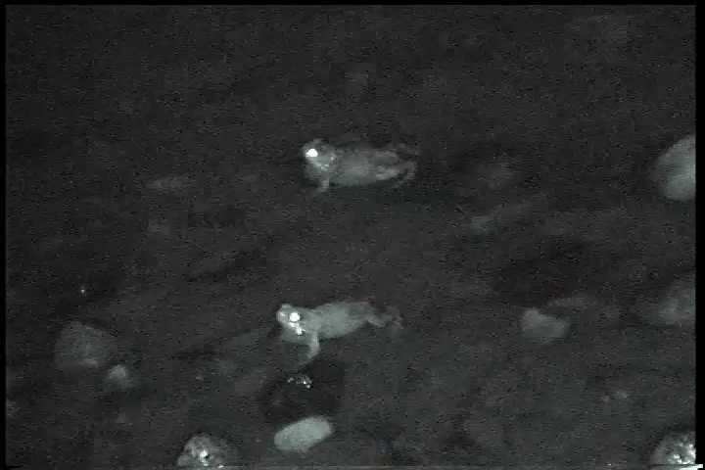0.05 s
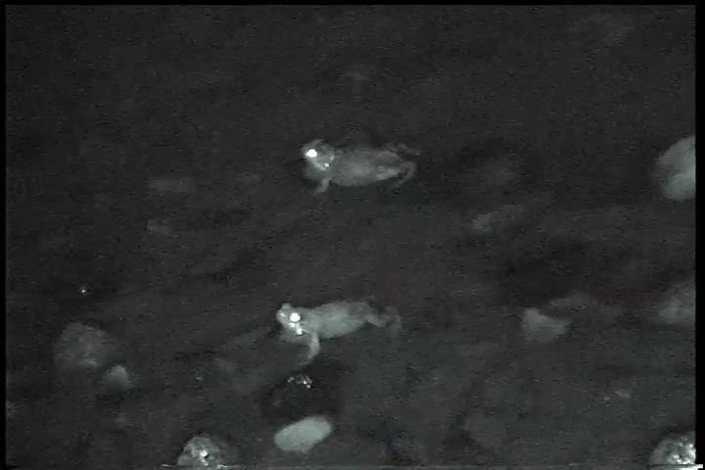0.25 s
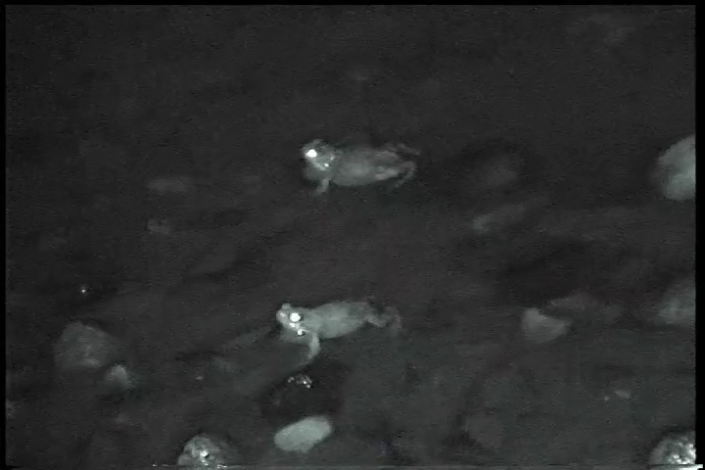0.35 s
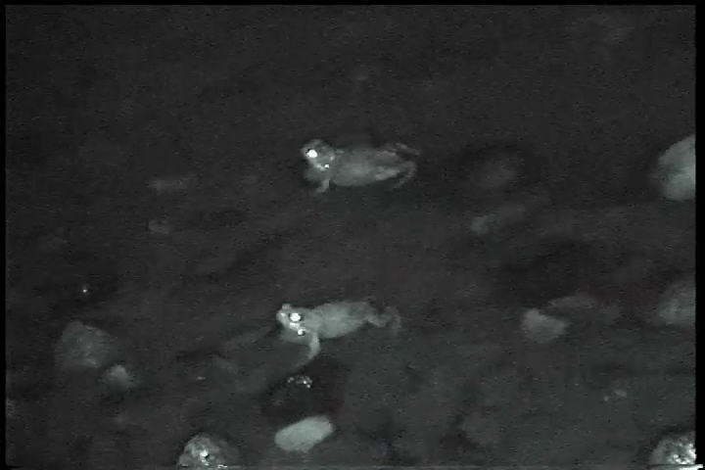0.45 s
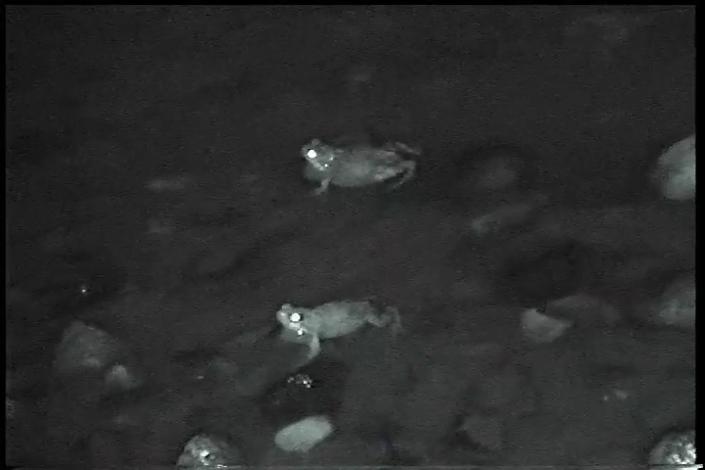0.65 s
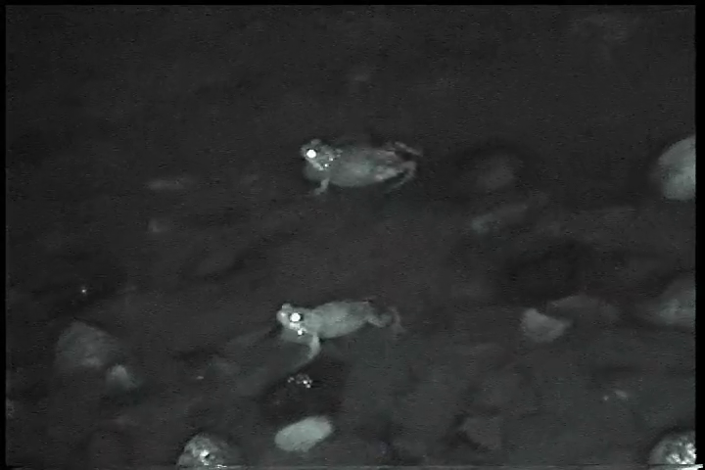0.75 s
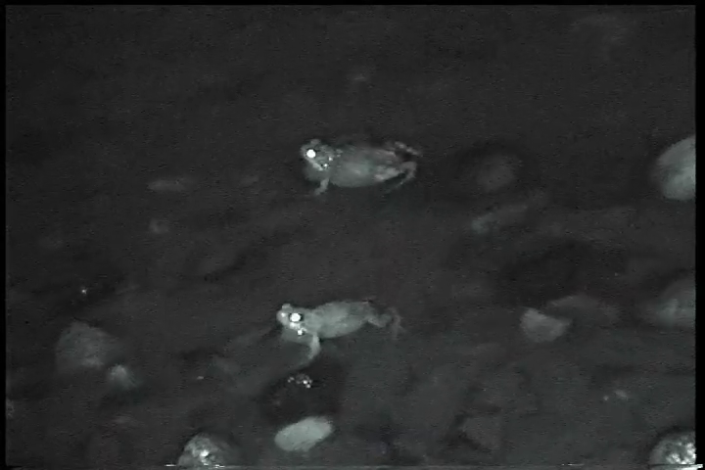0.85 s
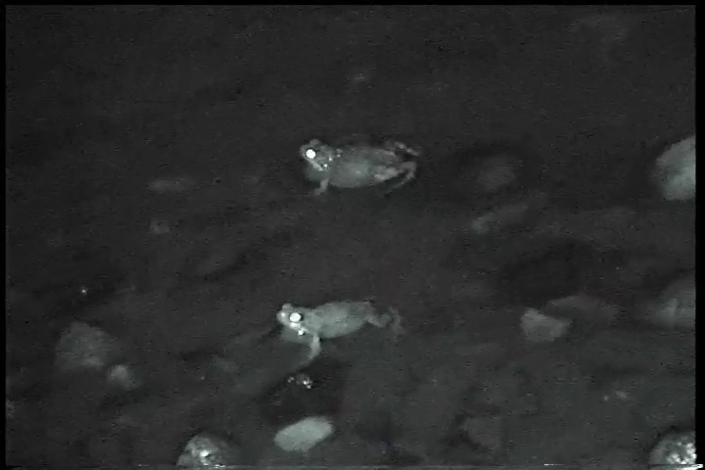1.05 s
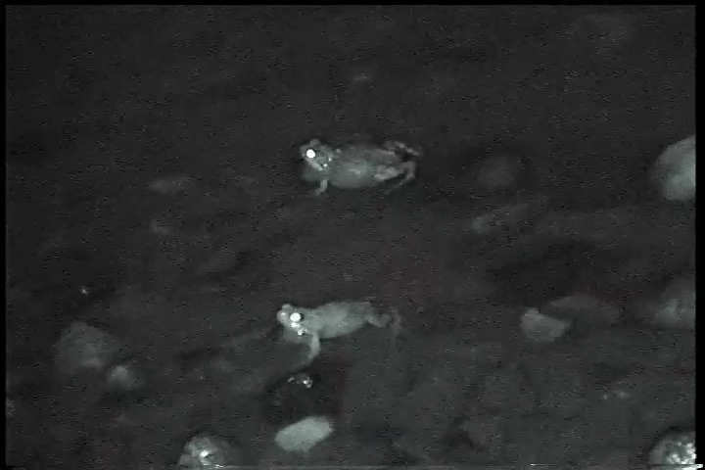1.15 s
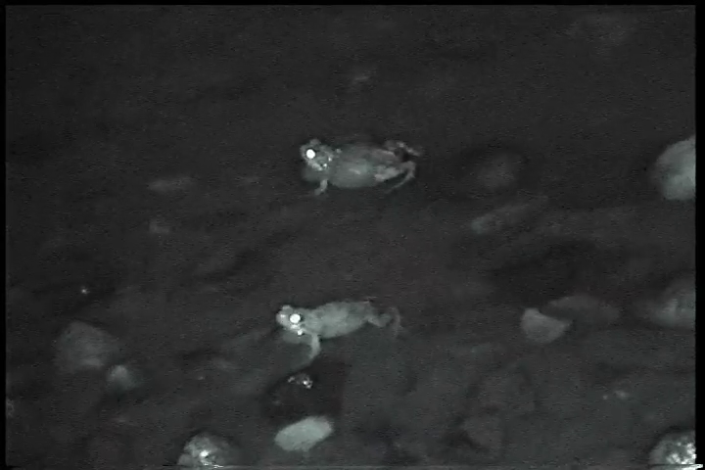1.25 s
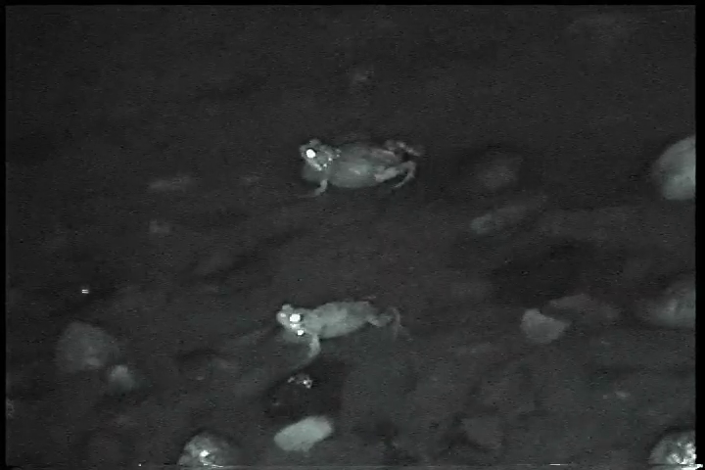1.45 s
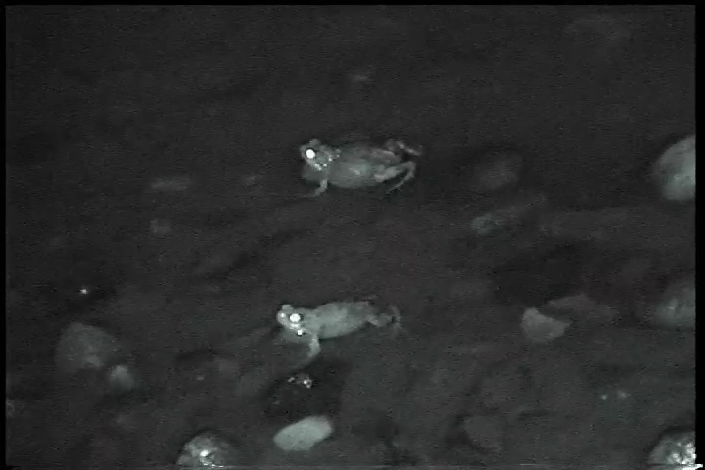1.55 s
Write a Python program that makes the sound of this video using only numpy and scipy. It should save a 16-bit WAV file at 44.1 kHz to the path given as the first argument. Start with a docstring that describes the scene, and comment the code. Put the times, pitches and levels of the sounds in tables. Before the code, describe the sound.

Frogs calling with downward whines and a short chuck, with an insect chorus behind.

```python
"""A small frog close to the microphone, on the right, gives a falling whine that ends in a chuck.
It calls from shallow water at night; a second answers with a whine that sinks into a low moan, and
others whine farther off. A whine is a larynx tone whose overtones slide through the resonances of the
vocal sac; a chuck is a run of pulses striking the throat. Behind the pool is a steady chorus of insects
in soft night air, and the recorder adds a faint hum and whistle."""
import sys
import numpy as np
from scipy import signal
from scipy.fft import rfft, irfft
from scipy.io import wavfile
from scipy.ndimage import uniform_filter1d

SR = 44100
rng = np.random.default_rng(int(sys.argv[2]) if len(sys.argv) > 2 else 0)


def file_out(sig):
    """Save sig as 16-bit WAV at sys.argv[1]."""
    # one column per channel
    cols = np.atleast_2d(sig).T
    # limit, then scale
    lim = np.clip(cols, -1, 1)
    pcm = np.round(lim * 32767).astype(np.int16)
    wavfile.write(sys.argv[1], SR, pcm)


N = 70560
T = np.arange(N) / SR

# night air all around: (frequency [Hz], relative density [dB])
AIR_SPECTRUM = [(25, -78.5), (70, -74.5), (170, -85), (500, -85), (1000, -84.5), (1400, -90.5), (2000, -88),
                (3400, -90), (4500, -84), (5200, -92), (6500, -78), (8200, -97.5), (8900, -83.5),
                (10000, -84)]
# its likeness in the two channels: (frequency [Hz], correlation [clipped to -1..1])
AIR_LIKENESS = [(60, -1.1), (250, -.5), (520, -0.34), (1070, -0.15), (2200, 0.57), (4500, 0)]
# its lean to one side: (frequency [Hz], pan [dB]); every pan is left minus right
AIR_PAN = [(40, 5.5), (120, 6), (400, -2.5), (1500, 2.5), (5000, 1.5)]
# distant insects and frogs: (centre [Hz], width [Hz], level [dB], pulse rate [1/s], pulse depth [0-1])
CHORUS_BANDS = [(437, 55, -64, 3.19, 0.3), (2607, 130, -57, 14, 0.7), (2990, 120, -63, 7.2, 0),
                (3880, 375, -55, 40, 0.17), (4334, 28, -57.5, 20, 0.3), (4695, 77, -52.5, 45, .3),
                (4817, 120, -51.5, 14, .3), (4962, 62, -50, 11, 0.36), (5330, 30, -58.5, 16, 0),
                (5710, 270, -50, 30, 0.22), (6080, 95, -53.5, 53, 0), (6195, 110, -47.5, 35, 0.3),
                (6450, 180, -47, 35, 0), (6653, 55, -49.5, 35, 0.7), (7000, 39, -54, 23, 0.1),
                (7195, 330, -46.5, 18, 0.17), (7550, 120, -52, 25, 0), (7838, 270, -50, 58, 0.4),
                (9280, 220, -56.5, 86, 0), (9687, 440, -52.5, 95, 0.5)]
# frogs farther off: (start [s], length [s], first pitch [Hz], target pitch [Hz], glide time [s],
# first level [dB], relative overtones at mid-call [dB], brightening [dB/s], pan [dB])
FAR_WHINES = [(-.04, 0.336, 819, 382, 0.21, -43.5, -2.5, 72, -5),
              (0.338, .31, 898.5, 400, .168, -45, -11, 17, 0),
              (1.184, 0.228, 838, 481, .14, -49.5, -6, 20, -6),
              (1.596, .3, 990, 420, .17, -27.5, -19, 20, 9)]
# larynx overtones: (multiple [of the pitch], relative level [dB], full strength below pitch [Hz])
FAR_LARYNX = [(2, 1.5, 630), (3, -8.5, 680), (4, -1.5, 610), (5, -6, 450)]
SECOND_LARYNX = [(2, 3.5, 1000), (3, -12.5, 700), (4, -1.5, 720), (5, -5, 670), (6, 4.5, 450)]
NEAR_LARYNX = [(2, -0.5, 1100), (3, -9.5, 1100), (4, -1.5, 1100), (5, -2, 630), (6, -12, 580),
               (7, -24, 800)]
# what the vocal sac radiates: (frequency [Hz], relative gain [dB])
SECOND_SAC = [(950, -9.5), (1300, -9.5), (1700, -1), (2350, 2), (2800, -4.5), (3300, -4.5), (3700, -18),
              (4300, -27)]
NEAR_SAC = [(950, -13), (1300, -5.5), (1700, -6.5), (2300, 4), (2750, -7.5), (3400, -6.5), (3800, -14),
            (4300, -26)]
# fall of the two close whines: (time [s], pitch [Hz])
SECOND_PITCH = [(1.085, 882.4), (1.115, 812.5), (1.155, 698), (1.199, 627), (1.313, 522.2), (1.379, 488),
                (1.423, 480.7), (1.465, 452)]
NEAR_PITCH = [(0.211, 948.6), (0.223, 913), (0.247, 816.4), (0.303, 655.3), (0.329, 621.7), (0.399, 581.3),
              (0.515, 499.5), (0.533, 497), (0.547, 459), (0.567, 428), (0.59, 419.4)]
# their fundamentals: (time [s], level [dB])
SECOND_LEVEL = [(1.085, -37.5), (1.097, -35.5), (1.115, -31.5), (1.293, -36), (1.441, -49), (1.465, -64)]
NEAR_LEVEL = [(0.211, -24.5), (0.219, -21), (0.239, -20), (0.279, -28), (0.441, -33.5), (0.569, -45),
              (0.59, -54)]
# their overtones together: (time [s], level [dB])
SECOND_OVERTONES = [(1.085, -59), (1.097, -46), (1.245, -37.5), (1.363, -49), (1.459, -53.5), (1.465, -66)]
NEAR_OVERTONES = [(0.211, -33.5), (0.219, -33.5), (0.427, -34.5), (0.471, -38.5), (0.481, -43.5),
                  (0.535, -50.5)]
# the second frog's closing moan: (time [s], pitch [Hz], level [dB])
MOAN_CONTOUR = [(1.464, 447, -57), (1.5, 436.5, -57.5), (1.538, 425.6, -44), (1.552, 431, -46.5),
                (1.563, 407, -55.5), (1.58, 419, -50), (1.6, 420, -53)]
# its harmonics: (multiple [of the pitch], relative level [dB])
MOAN_HARMONICS = [(1, -0.5), (2, -5), (3, -7), (4, -18), (5, -26), (6, -19)]
# the near frog's chucks, pulsing at about half its whine's pitch:
# (start [s], length [s], first pulse rate [1/s], peak relative to CHUCK_DB [dB])
CHUCKS = [(.2795, .022, 340, -9), (.5512, .0325, 224.5, 0)]
# throat resonances struck by each pulse: (frequency [Hz], relative level [dB], time to fall 60 dB [s])
THROAT_MODES = [(1105, -11.5, 0.0069), (1654, -3, 0.0039), (2130, 0.5, 0.0059), (2743, -2.5, 0.012)]
# mains hum in the recorder: (frequency [Hz], level [dB])
MAINS_HUM = [(60, -65.5), (120, -68.5), (180, -71.5)]

AIR_DB = -43.5
BANK_DB, BANK_T60_S = -13.5, 0.18
FAR_ATTACK_S, FAR_RELEASE_S, FAR_FADE_DB_PER_S = 0.0085, 0.066, 27.5
ATTACK_S, RELEASE_S, SETS_IN_DB_PER_HZ = 0.0034, .012, 0.3
NEAR_PAN_DB, SECOND_PAN_DB, NEAR_LEFT_DELAY_S = -10.5, -1.8, .00004
CHUCK_DB, CHUCK_PAN_DB, CHUCK_TOP_HZ = -14, -9, 3010
CHUCK_FIRST_FORCE, CHUCK_RISE_S, CHUCK_FALL_POWER = 0.53, .005, 2.6
CHUCK_SLOWS_PER_S, CHUCK_JITTER_S, CHUCK_DULLS_PER_HZ = 2.7, .00003, 0.00042
MIC_TOP_HZ, RECORDER_TOP_HZ = 9950, 16000
HUM_PAN_DB, WHISTLE_HZ, WHISTLE_DB = 2, 15735, -76


def from_db(db):
    """Decibels to gain."""
    return 10 ** (np.asarray(db) / 20)


def rms_one(x):
    """Scale to unit rms."""
    return x / np.sqrt(np.mean(x ** 2) + 1e-20)


def in_time(rows):
    """Each column of a curve at every sample."""
    times, *columns = np.transpose(rows)
    return [np.interp(T, times, column) for column in columns]


def at_hz(points, hz):
    """Read a spectrum on a log-frequency axis."""
    freqs, values = np.transpose(points)
    return np.interp(np.log(hz + 1e-9), np.log(freqs), values)


def pan(db):
    """Left and right gains with mean 1; positive is to the microphone's left."""
    gains = from_db(np.array([np.atleast_1d(db), -np.atleast_1d(db)]) / 2)
    return gains / gains.mean(axis=0)


def gate(start, end, attack, release):
    """Rise from start, hold, and fall to nothing at end."""
    return np.clip((T - start) / attack, 0, 1) * np.clip((end - T) / release, 0, 1)


def tone(hz):
    """A sine of unit rms that follows a pitch."""
    return np.sqrt(2) * np.sin(2 * np.pi * np.cumsum(hz * np.ones(N)) / SR + rng.uniform(0, 2 * np.pi))


def night_air():
    """A soft, wide bed of noise all around the microphone."""
    hz = np.arange(N // 2 + 1) * SR / N
    mid, side = rfft(rng.standard_normal((2, N)))
    alike = np.clip(at_hz(AIR_LIKENESS, hz), -1, 1)
    stereo = np.sqrt(1 + alike) * mid + np.sqrt(1 - alike) * side * [[1], [-1]]
    spectrum = stereo * from_db(at_hz(AIR_SPECTRUM, hz)) * pan(at_hz(AIR_PAN, hz)) * (hz < MIC_TOP_HZ)
    return from_db(AIR_DB) * rms_one(irfft(spectrum, N))


def chorus():
    """Far behind the pool many singers share each pitch: narrow bands, most throbbing unsteadily."""
    out, hz = 0, np.arange(N // 2 + 1) * SR / N
    for centre, width, db, rate, depth in CHORUS_BANDS:
        shape = 1 / np.sqrt(1 + (2 * np.abs(hz - centre) / width) ** 6)
        band = rms_one(irfft(rfft(rng.standard_normal((2, N))) * shape, N))
        drift = rms_one(uniform_filter1d(rng.standard_normal(N), size=4000))
        throb = 1 + depth * tone(rate * (1 + .04 * drift)) / np.sqrt(2)
        out = out + from_db(db) * rms_one(band * throb)
    return out


def bank_scatter(calls):
    """The calls come back faintly from the stones and plants around the pool."""
    tail = rng.standard_normal((2, N)) * from_db(-60 * T / BANK_T60_S)
    tail /= np.sqrt(np.sum(tail ** 2, axis=1, keepdims=True))
    return from_db(BANK_DB) * signal.fftconvolve(calls.mean(axis=0)[None], tail, axes=1)[:, :N]


def frog_voice(hz, level_db, overtones_db, larynx, sac):
    """A larynx tone whose overtones set in as the pitch falls and slide through the sac's resonances."""
    gains = {}
    for multiple, db, full_hz in larynx:
        held_back_db = SETS_IN_DB_PER_HZ * np.maximum(hz - full_hz, 0)
        gains[multiple] = from_db(db + at_hz(sac, multiple * hz) - held_back_db)
    overtones = sum(gain * tone(multiple * hz) for multiple, gain in gains.items())
    overtones /= np.sqrt(sum(gain ** 2 for gain in gains.values()))
    return from_db(level_db) * tone(hz) + from_db(overtones_db) * overtones


def far_whines():
    """Frogs farther from the microphone: each call glides down, fading and growing reedier."""
    out = 0
    for start, length, first_hz, target_hz, glide, db, relative_db, brightening, pan_db in FAR_WHINES:
        age = np.clip(T - start, 0, length)
        hz = target_hz + (first_hz - target_hz) * np.exp(-age / glide)
        level_db = db - FAR_FADE_DB_PER_S * age
        overtones_db = level_db + relative_db + brightening * (age - length / 2)
        call = frog_voice(hz, level_db, overtones_db, FAR_LARYNX, SECOND_SAC)
        out = out + pan(pan_db) * call * gate(start, start + length, FAR_ATTACK_S, FAR_RELEASE_S)
    return out


def moan():
    """A low, reedy stack of harmonics ends the second frog's call."""
    hz, db = in_time(MOAN_CONTOUR)
    stack = sum(from_db(level) * tone(multiple * hz) for multiple, level in MOAN_HARMONICS)
    sounding = gate(MOAN_CONTOUR[0][0], MOAN_CONTOUR[-1][0] + RELEASE_S, RELEASE_S, RELEASE_S)
    return stack * from_db(db) * sounding


def chucks():
    """Short runs of slowing pulses strike the resonances of the near frog's throat."""
    out = 0
    for start, length, rate, db in CHUCKS:
        age = np.arange(int(length * rate) + 1) / rate
        age *= 1 + CHUCK_SLOWS_PER_S * age / 2
        age += np.abs(rng.normal(0, CHUCK_JITTER_S, len(age)))
        rise = np.minimum(CHUCK_FIRST_FORCE + age / CHUCK_RISE_S, 1)
        fall = np.maximum(1 - (age / length) ** CHUCK_FALL_POWER, 0)
        pulses = np.zeros(N)
        pulses[((start + age) * SR).astype(int)] = rise * fall
        throat = 0
        for k, (hz, level, t60) in enumerate(THROAT_MODES):
            strikes = pulses ** (hz * CHUCK_DULLS_PER_HZ) + 1e-18  # weaker pulses are duller
            decay, angle = from_db(-60 / (t60 * SR)), 2 * np.pi * hz / SR
            ring = signal.lfilter([0, np.sin(angle)], [1, -2 * decay * np.cos(angle), decay ** 2], strikes)
            throat = throat + (-1) ** k * from_db(level) * ring
        throat = signal.sosfilt(signal.butter(10, CHUCK_TOP_HZ, fs=SR, output="sos"), throat)
        out = out + from_db(CHUCK_DB + db) * throat / np.abs(throat).max()
    return out


def close_whine(pitch, level, overtones, larynx, sac):
    """A clean, rounded downward sweep from a frog close to the microphone."""
    hz = uniform_filter1d(in_time(pitch)[0], size=800)
    dying_db = 60 * np.clip((T - overtones[-1][0]) / (2 * RELEASE_S), 0, 1)
    sounding = gate(level[0][0] - ATTACK_S / 2, level[-1][0] + RELEASE_S, ATTACK_S, RELEASE_S)
    return frog_voice(hz, in_time(level)[0], in_time(overtones)[0] - dying_db, larynx, sac) * sounding


def scene():
    """From the microphone: one frog near right, one almost ahead, the rest and the chorus beyond."""
    near_whine = close_whine(NEAR_PITCH, NEAR_LEVEL, NEAR_OVERTONES, NEAR_LARYNX, NEAR_SAC)
    near = pan(NEAR_PAN_DB) * near_whine + pan(CHUCK_PAN_DB) * chucks()
    near[0] = np.interp(T - NEAR_LEFT_DELAY_S, T, near[0])
    answer = close_whine(SECOND_PITCH, SECOND_LEVEL, SECOND_OVERTONES, SECOND_LARYNX, SECOND_SAC)
    frogs = near + pan(SECOND_PAN_DB) * (answer + moan()) + far_whines()
    return frogs + bank_scatter(frogs) + chorus() + night_air()


def record(dry):
    """A microphone of limited range, with mains hum and a thin electronic whistle from the recorder."""
    heard = signal.sosfilt(signal.ellip(10, .2, 70, MIC_TOP_HZ, fs=SR, output="sos"), dry)
    heard += pan(HUM_PAN_DB) * sum(from_db(db) * tone(hz) for hz, db in MAINS_HUM)
    heard += from_db(WHISTLE_DB) * tone(WHISTLE_HZ)
    return signal.sosfilt(signal.ellip(10, .2, 70, RECORDER_TOP_HZ, fs=SR, output="sos"), heard)


dry = scene()
out = record(dry)
file_out(out)
```